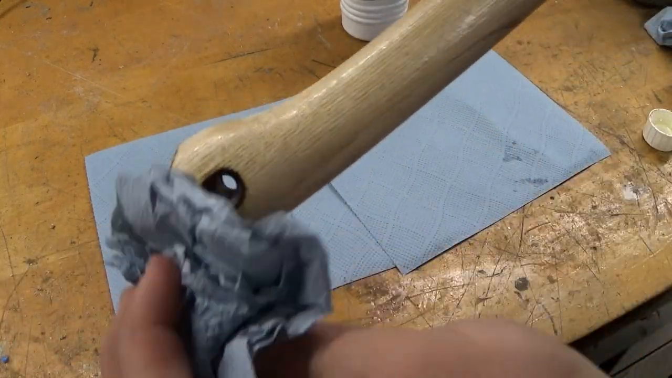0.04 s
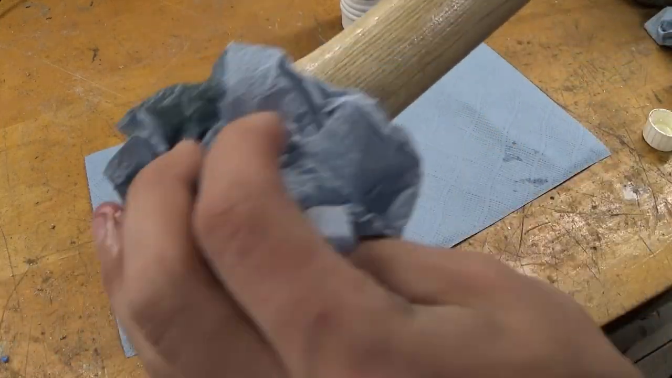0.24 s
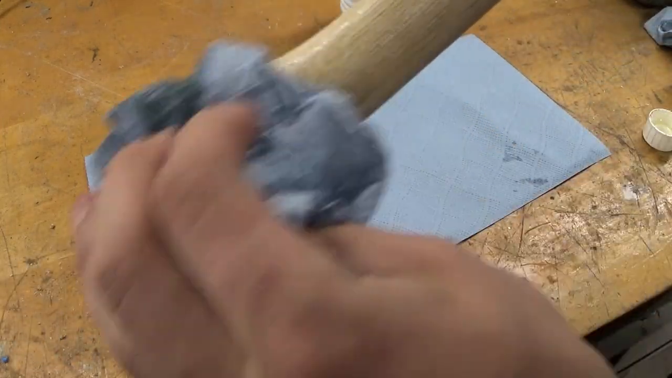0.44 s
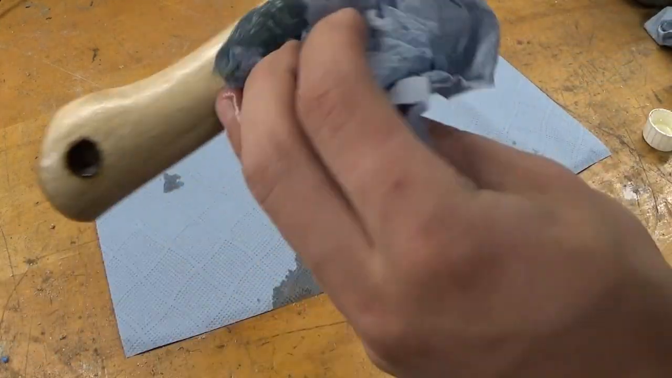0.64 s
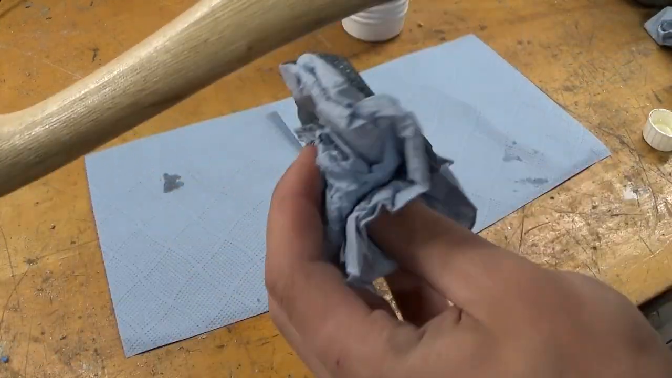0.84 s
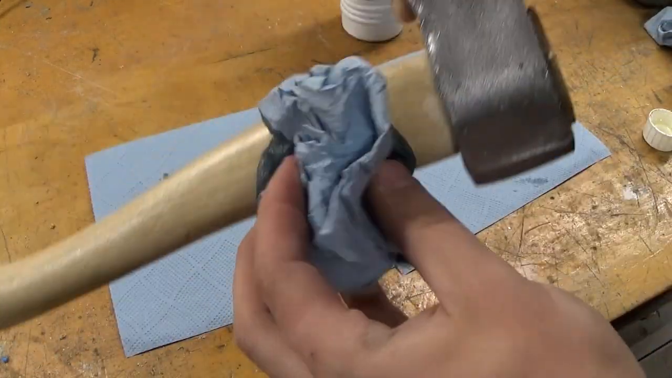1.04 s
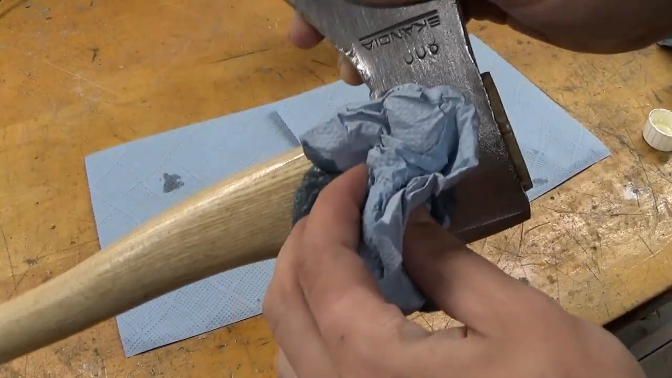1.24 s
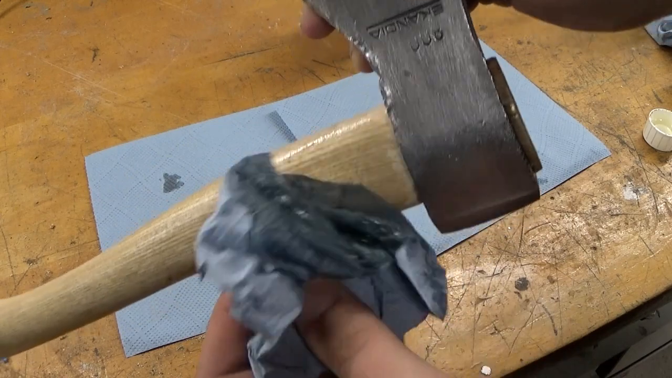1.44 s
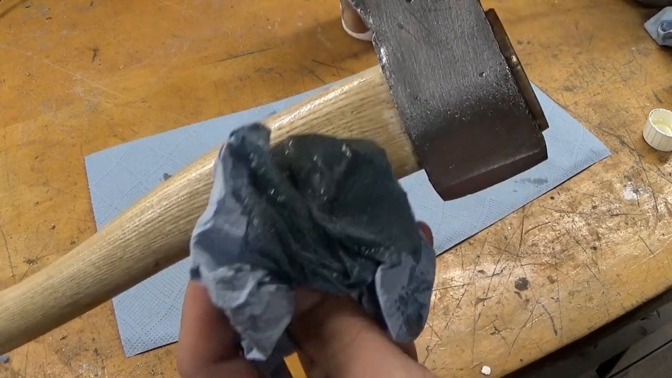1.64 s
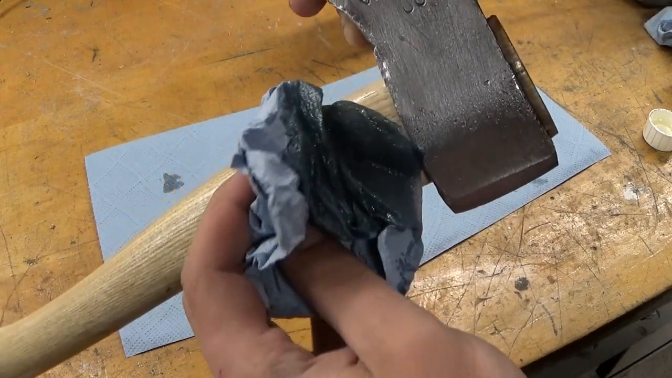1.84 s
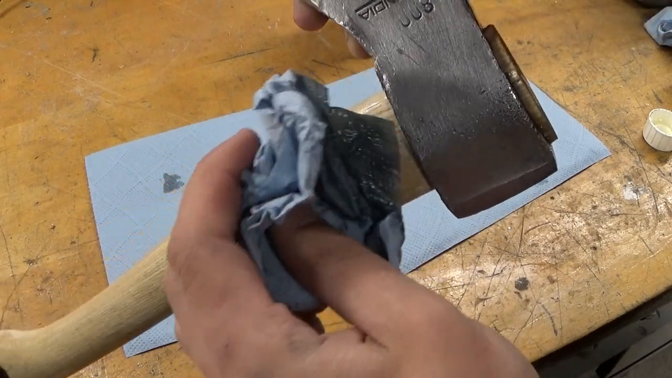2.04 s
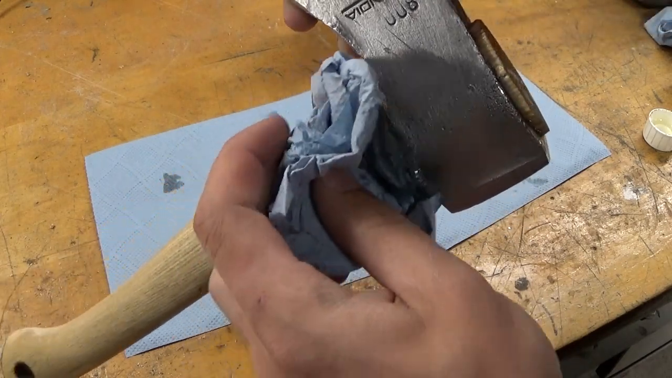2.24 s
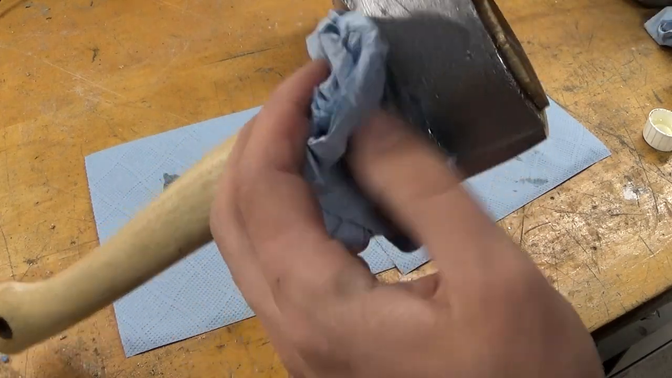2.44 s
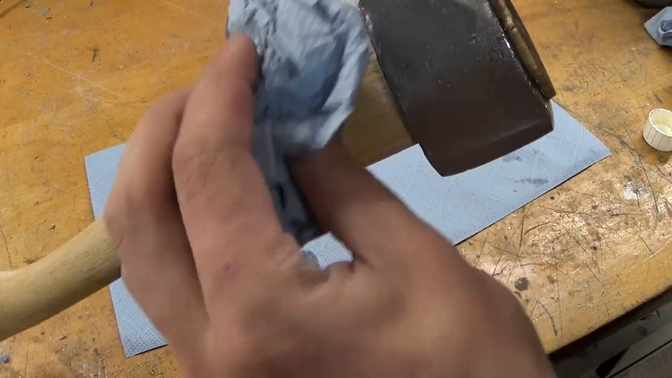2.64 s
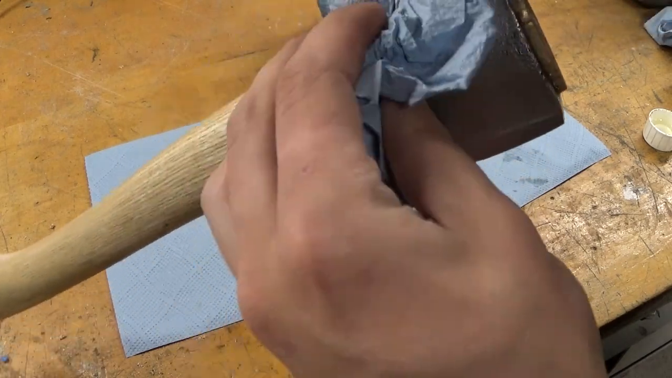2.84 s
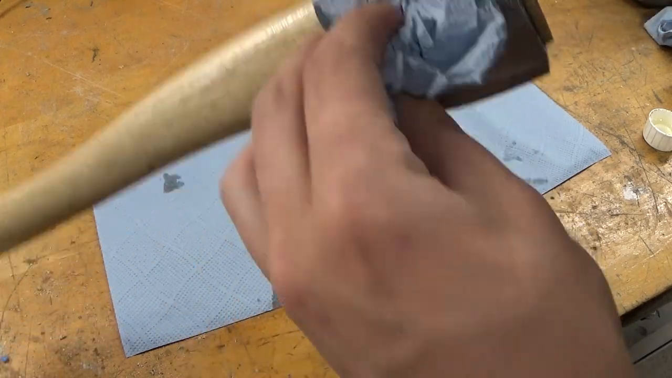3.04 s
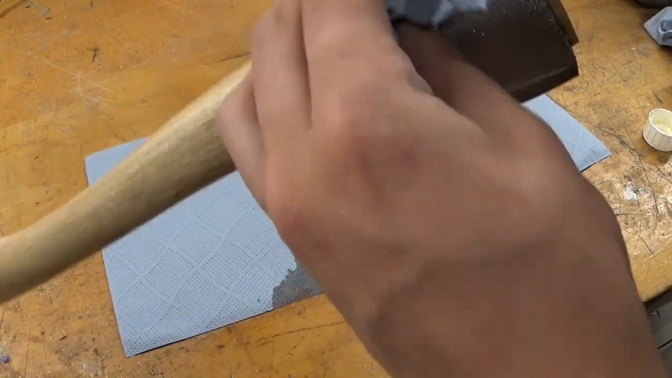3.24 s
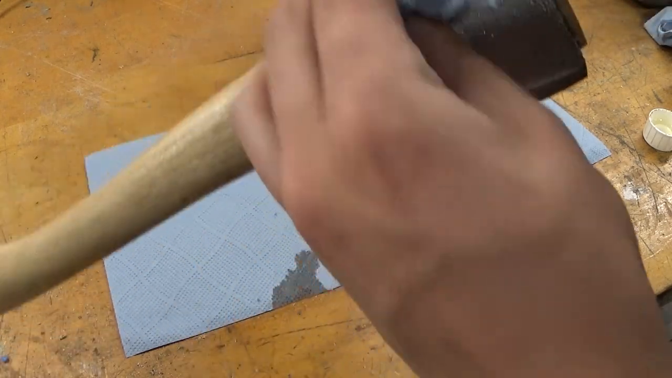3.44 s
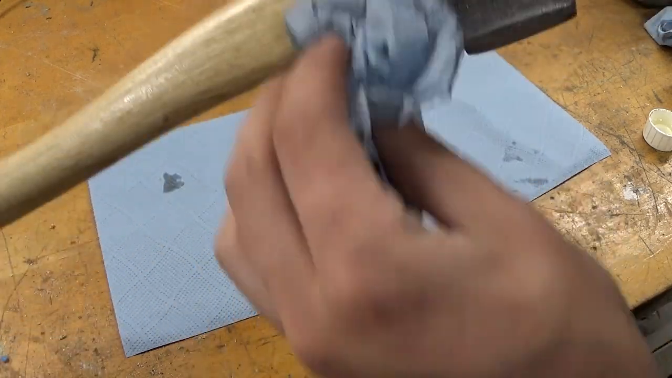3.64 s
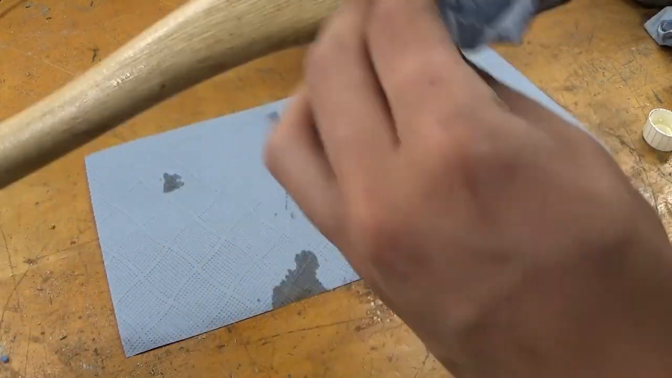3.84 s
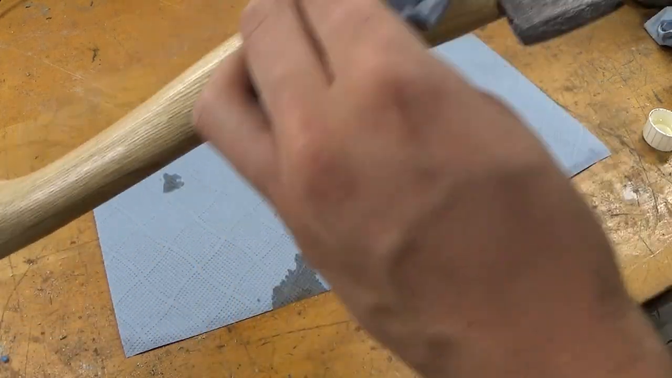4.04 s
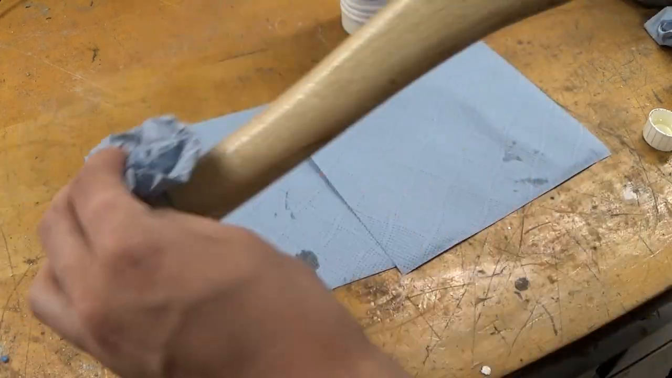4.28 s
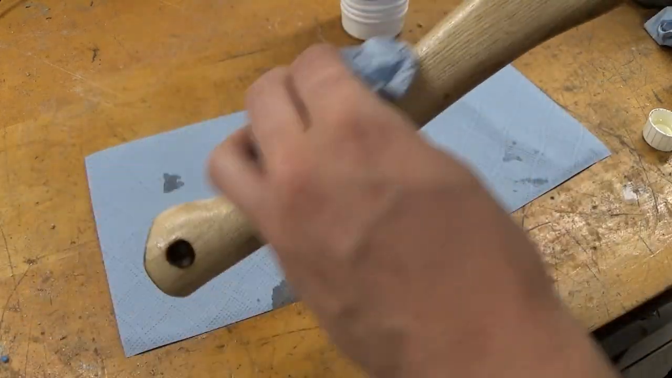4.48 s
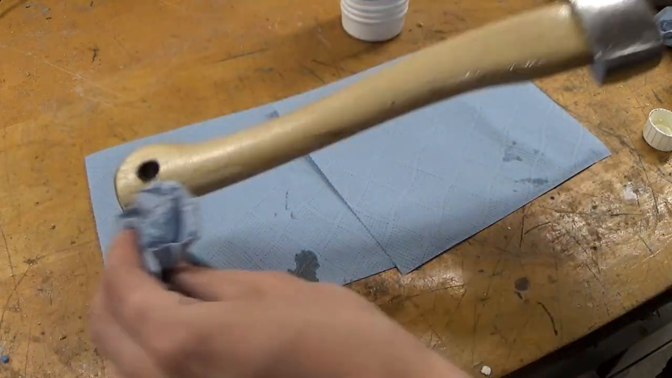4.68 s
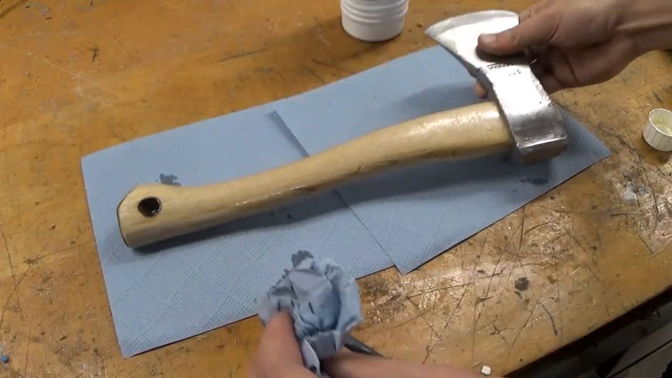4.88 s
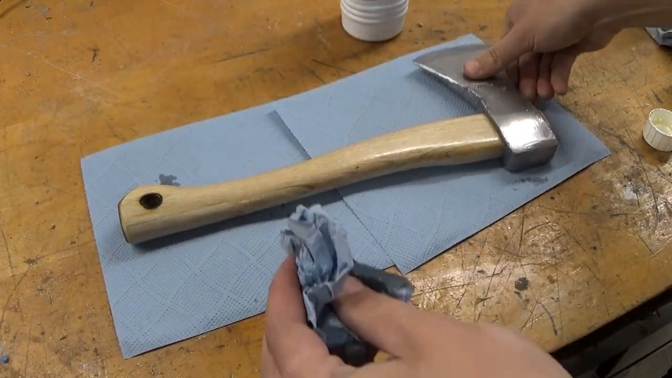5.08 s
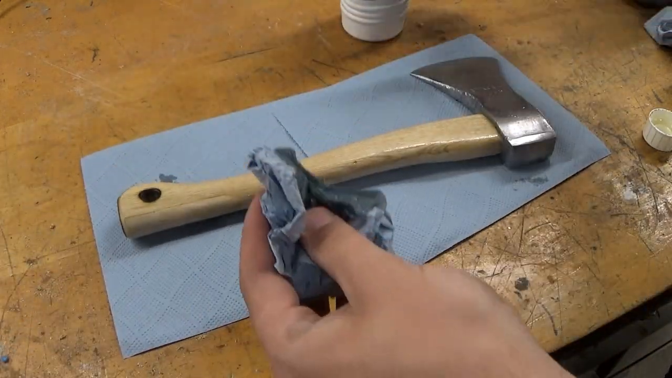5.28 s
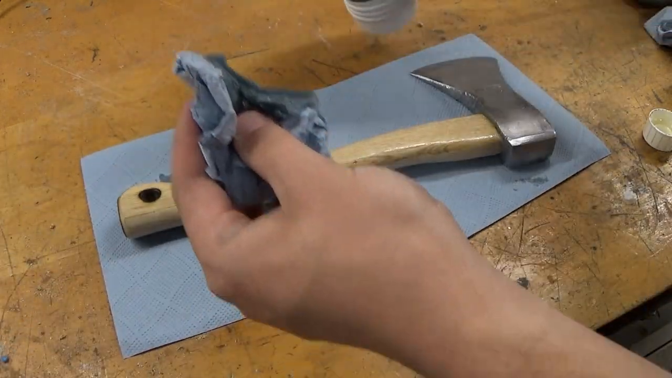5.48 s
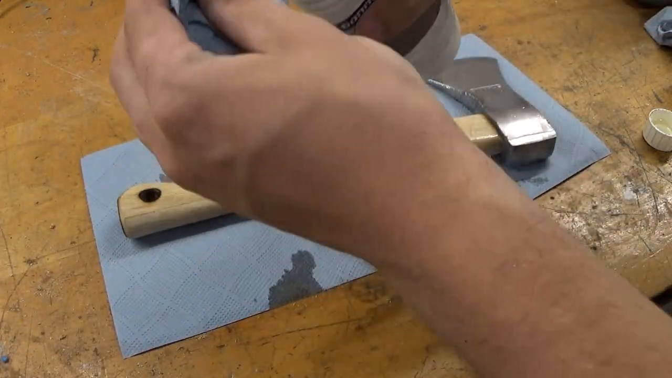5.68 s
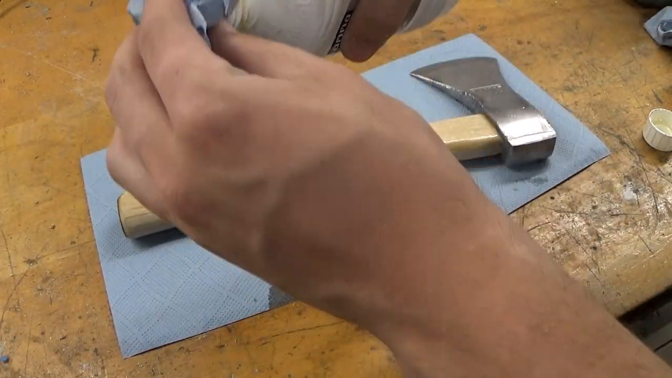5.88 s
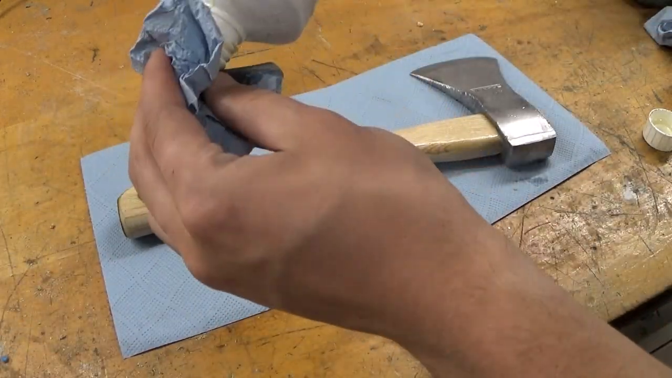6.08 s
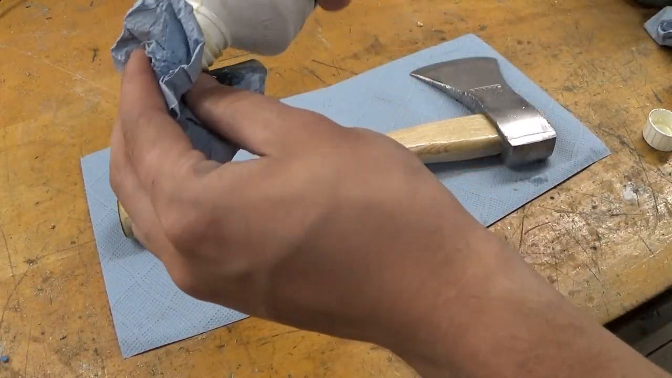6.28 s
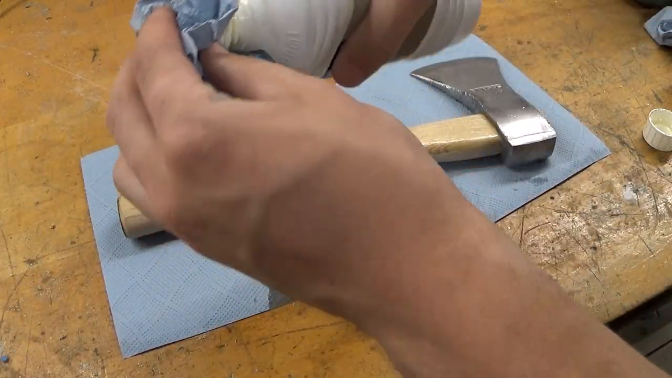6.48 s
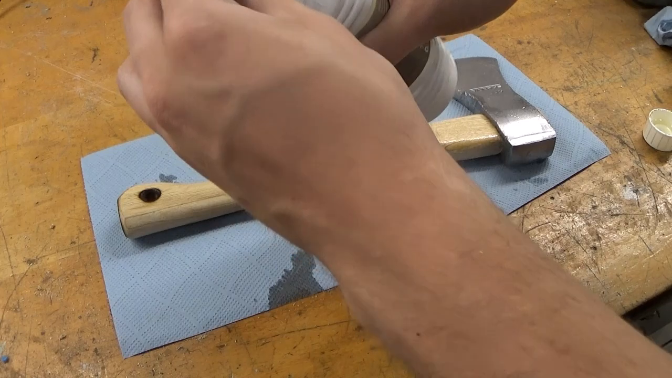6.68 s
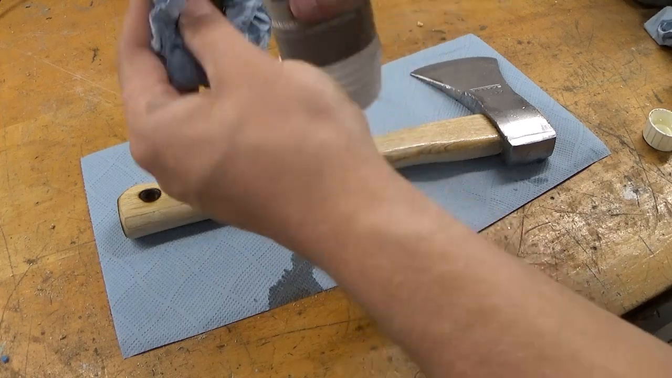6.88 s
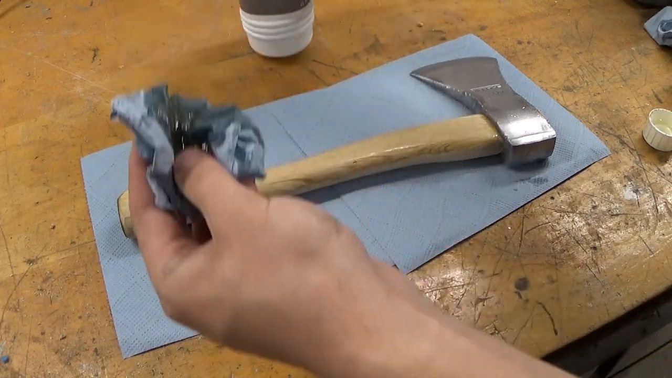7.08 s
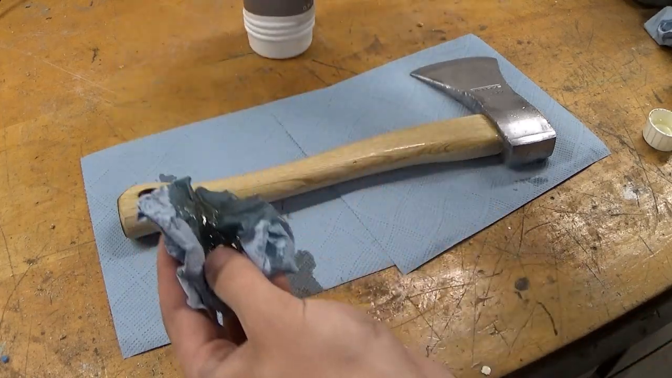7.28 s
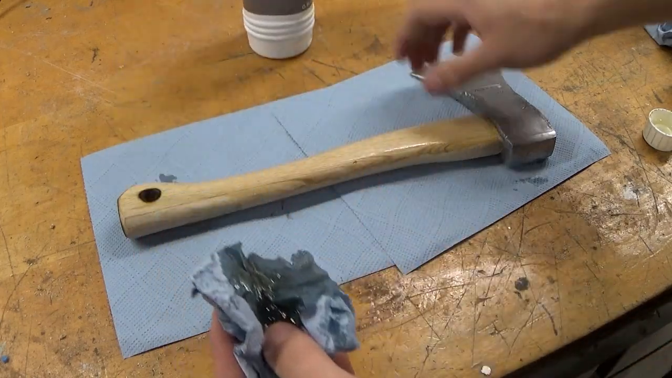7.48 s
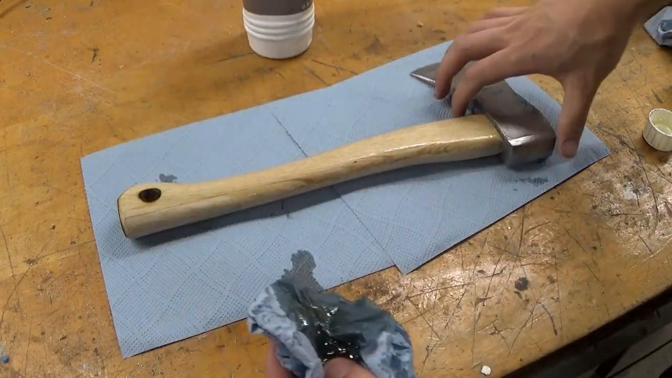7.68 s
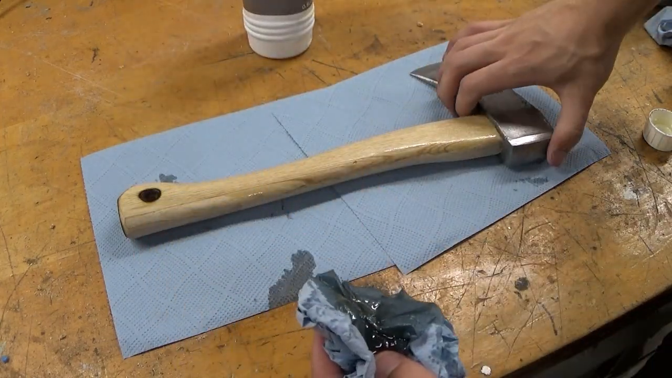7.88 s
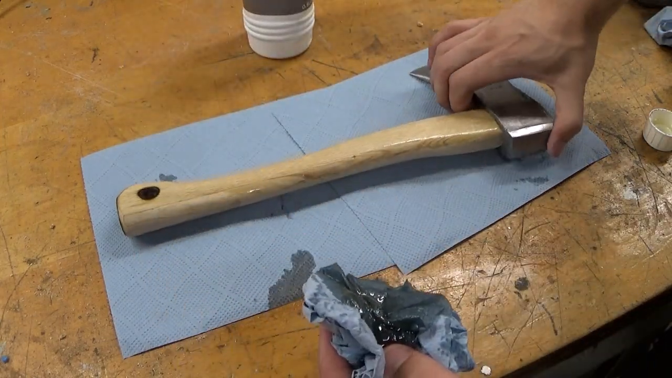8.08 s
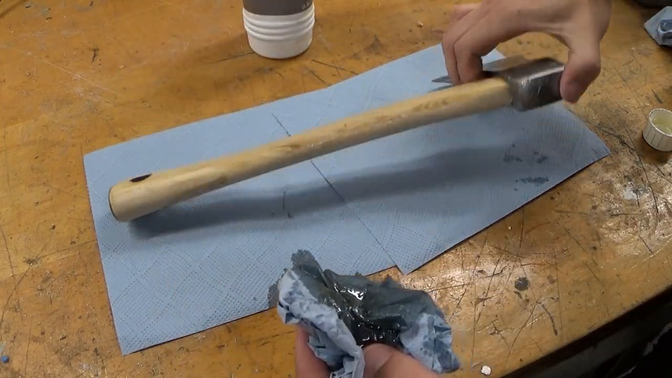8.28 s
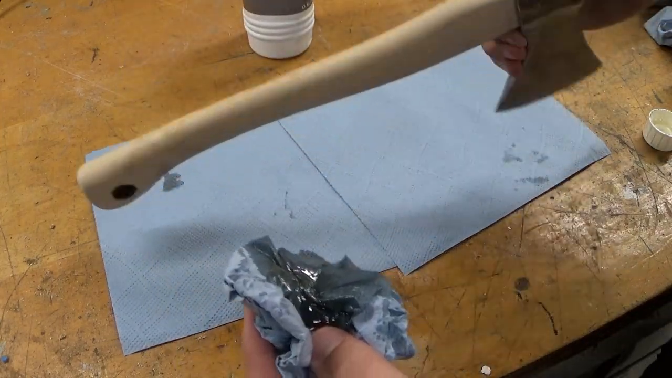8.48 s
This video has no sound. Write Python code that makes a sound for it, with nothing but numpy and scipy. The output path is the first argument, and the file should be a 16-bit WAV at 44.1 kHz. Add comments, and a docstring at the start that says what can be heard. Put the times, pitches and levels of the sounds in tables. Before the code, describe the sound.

Fast, bright papery rubbing strokes with crackly snaps, then wood-and-steel knocks on a bench, then quiet liquid gulps, light rustles and a faint cricket.

```python
"""A room hums faintly throughout and a far cricket trills, loudest after 7.2 s.
0-4.7 s: a crumpled paper towel scrubs a hatchet to and fro (slipping fibres); the handle knocks a bench once.
4.8-5.5 s: the hatchet is laid down with a few bounces (ringing wood and steel modes, rattle noise).
From 5.6 s: an oil bottle is tipped on the towel (gulp tones, ticks, rustles), set down near 7.2 s.
A limiter with fast attack and slow release holds the loud parts down."""
import sys
import numpy as np
from scipy import signal
from scipy.fft import rfft, irfft
from scipy.io import wavfile
from scipy.ndimage import uniform_filter1d

SR = 44100
rng = np.random.default_rng(int(sys.argv[2]) if len(sys.argv) > 2 else 0)


def store_wav(level_fs):
    """Save 16-bit WAV to argv[1]."""
    pcm = np.round(np.clip(np.atleast_2d(level_fs), -1, 1) * 32767)
    wavfile.write(sys.argv[1], SR, pcm.T.astype(np.int16))


N = 375732


def from_db(db):
    """Amplitude ratio of a level in dB."""
    return 10 ** (np.asarray(db) / 20)


def rms_one(x):
    """Scale to rms 1."""
    return x / np.sqrt(np.mean(x ** 2) + 1e-20)


def at_hz(points, hz):
    """Interpolate a (f/Hz, value) table over log frequency."""
    table_hz, values = np.array(points).T
    return np.interp(np.log(hz), np.log(table_hz), values)


def drift(rate_hz):
    """Slow chance of rms 1: noise at every 40th sample through a double one-pole low-pass."""
    r = np.exp(-80 * np.pi * rate_hz / SR)
    noise = rng.standard_normal(N // 40 + 2002)
    slow = signal.lfilter([1], [1, -2 * r, r * r], noise)[2000:]  # drop the filter's start
    return np.interp(np.arange(N) / 40, np.arange(len(slow)), rms_one(slow))


def clicks(times_s, sizes):
    """Train of single samples on a negligible floor."""
    out = np.full(N, 1e-18)
    out[np.round(np.asarray(times_s) * SR).astype(int)] = sizes
    return out


def ring(drive, hz, t60_s):
    """Two-pole resonator: a unit click sets off a decaying sine of initial height 1."""
    r = from_db(-60 / (t60_s * SR))
    w = 2 * np.pi * hz / SR
    return signal.lfilter([0, np.sin(w)], [1, -2 * r * np.cos(w), r * r], drive)


def spread(mid, side, alike):
    """Mix two unrelated signals to left and right with correlation `alike`."""
    return np.sqrt(1 + alike) * mid + np.sqrt(1 - alike) * side * [[1], [-1]]


def bands(low_hz, count, likeness):
    """Half-octave bands of stereo noise, neighbours unrelated; yields (f/Hz, band of rms 1)."""
    white = rng.standard_normal((2, 2, N))
    edges_hz = low_hz * 2 ** (np.arange(count + 1) / 2)
    for k, (low, high) in enumerate(zip(edges_hz, edges_hz[1:])):
        band_pass = signal.butter(2, [low, high], "band", fs=SR, output="sos")
        mid, side = signal.sosfilt(band_pass, white[k % 2])
        hz = np.sqrt(low * high)
        alike = np.clip(at_hz(likeness, hz), 0, 1)
        yield hz, rms_one(spread(mid, side, alike))


def coloured(mid_side, spectrum, likeness):
    """Two unrelated sources become a stereo pair with the given spectrum and likeness; rms 1."""
    hz = np.maximum(np.fft.rfftfreq(N, 1 / SR), 1)
    alike = np.clip(at_hz(likeness, hz), 0, 1)
    mid, side = rfft(mid_side) * from_db(at_hz(spectrum, hz))
    return rms_one(irfft(spread(mid, side, alike), N))


TURN_KNEE_DB, TURN_BEND = 10, 1.36  # level leaves its hold gently, drops ever faster beyond the knee
AFTER_DB, AFTER_FALL_DB_PER_S = -15.5, 150  # towel springs back and whispers on after a movement


def moves(s, held_s, level_db, swell_db, rise_db_per_s, fall_db_per_s):
    """Power of each movement, one value a ms: rounded rise, swelling or sagging hold, fall, faint tail."""
    t = np.arange(0, N / SR, .001)[:, None]
    held_s = np.maximum(held_s, .002)
    before_s = np.maximum(s - t, 0)
    after_s = np.maximum(t - s - held_s, 0)
    hold_db = level_db + swell_db * (np.clip((t - s) / held_s, 0, 1) - .5)
    straight_db = rise_db_per_s * before_s + fall_db_per_s * after_s
    turn_db = TURN_KNEE_DB * (straight_db / TURN_KNEE_DB) ** TURN_BEND
    tail = (after_s > 0) * 10 ** ((level_db + AFTER_DB - AFTER_FALL_DB_PER_S * after_s) / 10)
    return t[:, 0], 10 ** ((hold_db - turn_db) / 10) + tail


# room hum spectrum, relative: f/Hz, density/dB
ROOM_SPECTRUM = [(40, -17.5), (90, -4.5), (170, -8.5), (400, -8.5), (630, -7.5), (900, -10.5),
                 (2600, -15.5), (5000, -16), (7000, -23), (16000, -24)]
# room left-right correlation: f/Hz, likeness/1
ROOM_LIKENESS = [(60, 0.99), (180, 0.9), (550, 0.28), (1650, 0.09), (4970, 0.43), (15000, 0.91)]
ROOM_RMS_DB = -56.5


def room():
    """Steady faint hum of a small workshop: coloured noise."""
    return from_db(ROOM_RMS_DB) * coloured(rng.standard_normal((2, N)), ROOM_SPECTRUM, ROOM_LIKENESS)


CRICKET_HZ, CRICKET_T60_S, CRICKET_DB, CRICKET_PULSES_PER_S = 5030, 0.024, -71.5, 40
TRILL_S, TRILL_HELD_S, TRILL_LIFT_DB = 7.2, .6, 6.5  # loudest trill


def cricket():
    """Noise pulses ring one pitch; the level comes and goes, left and right unrelated."""
    t = np.arange(N) / SR
    s = np.cumsum(rng.normal(1, 0.044, 400)) / CRICKET_PULSES_PER_S
    pulses = signal.lfilter(np.hanning(300), [1], clicks(s[s < N / SR - .01], 1))
    in_trill = np.abs(t - TRILL_S - TRILL_HELD_S / 2) < TRILL_HELD_S / 2
    level_db = CRICKET_DB + 2.2 * drift(1.9) + TRILL_LIFT_DB * in_trill
    trill = ring(pulses * rng.standard_normal((2, N)), CRICKET_HZ, CRICKET_T60_S)
    return from_db(level_db) * rms_one(trill)


# dull low thumps: t/s, level before softening/dB, f/Hz, t60/s
THUMPS = [(3.63, -33, 89, 0.039), (3.787, -32, 60, 0.051), (3.993, -30, 63.4, 0.14),
          (7.159, -21, 400, 0.038), (7.8, -53.5, 91, 0.53)]
# oil gulps in the bottle: t/s, level before softening/dB, f/Hz, t60/s
GULPS = [(5.735, -46, 840, 0.065), (5.767, -44.5, 837, 0.088), (6.029, -38.5, 434, 0.032),
         (6.699, -51.5, 1128, 0.099), (6.792, -51.5, 783, 0.075), (6.839, -52, 845, 0.19),
         (6.869, -57, 860, 0.12), (6.919, -50.5, 844, 0.15), (6.996, -51.5, 830, 0.085),
         (7.299, -43.5, 883, 0.061)]


def soft_tones(table, soften):
    """Single pitches with a low-passed start: air pockets in the oil, or a padded thump."""
    tones = sum(ring(clicks([s], from_db(db)), hz, t60_s) for s, db, hz, t60_s in table)
    return signal.lfilter([1 - soften], [1, -soften], tones)


# bottle and paper ticks, and the sharp cracks of knocks: t/s, peak of the noise puff/dB, f/Hz
TICKS = [(0.0238, -40, 9700), (0.0373, -28, 6400), (0.0967, -34, 7800), (0.1191, -25, 11300),
         (0.134, -26.5, 7690), (1.408, -9, 8900), (1.429, -8, 9000), (1.442, -14, 9000),
         (1.456, -11.5, 7050), (1.472, -10, 9000), (1.68, -11, 4500), (1.7094, -29, 8500),
         (2.0474, -10.5, 6260), (2.1495, -8.5, 5700), (2.3068, -11.5, 1830), (5.6506, -39.5, 5050),
         (5.893, -32, 9200), (5.9863, -33, 6050), (6.0484, -28.5, 1600), (6.049, -35.5, 420),
         (6.0495, -29, 5400), (6.115, -20, 3820), (6.4108, -37, 6700), (6.576, -33, 4800),
         (7.175, -27, 1704), (7.182, -31, 2500), (7.148, -38, 4470), (7.2, -34, 2490), (7.2205, -31, 6050),
         (7.655, -38, 9900)]
TICK_T60_S, TICK_CRACK = 0.028, 4.0  # the last: height of the first crack over the puff


def ticks():
    """A fast-dying noise puff, band-passed around its pitch, plus a short sine ring."""
    out = np.zeros(N)
    t = np.arange(4000) / SR
    fade = from_db(-60 * t / TICK_T60_S) + TICK_CRACK * from_db(-60 * t / .002)
    for s, db, hz in TICKS:
        noise = rng.standard_normal(len(t))
        edges_hz = [hz / 1.48, min(hz * 1.58, 17000)]
        puff = signal.lfilter(*signal.butter(2, edges_hz, "band", fs=SR), noise * fade)
        sine = np.sin(2 * np.pi * .87 * hz * t) * from_db(-40 * t / TICK_T60_S)
        snap = puff / np.abs(puff).max() + 0.16 * min(1, (3500 / hz) ** 2) * sine
        out[round(s * SR):][:len(t)] += from_db(db) * snap
    return out


# the head drags on the mat: t/s, held/s, level/dB
DRAGS = [(5.14, .03, -47), (8.195, .05, -61)]
# steel head modes, also rung by knocks(): f/Hz, level/dB, t60 when struck/s
STEEL_MODES = [(2605, -6.5, .11), (3020, -4, 0.082), (3060, 2.5, 0.1), (4245, -6.5, 0.17),
               (4300, -11.5, .12), (5200, -11.5, .08), (6320, -10.5, 0.19), (10600, -16, 0.12)]
LIGHT_RISE_DB_PER_S, LIGHT_FALL_DB_PER_S = 399, 331  # drags and rustles, slope before the turn's bend


def drags():
    """Friction noise sets the steel singing faintly, the long and high modes most."""
    s, held_s, level_db = np.transpose(DRAGS)
    ms, power = moves(s, held_s, level_db, 0, LIGHT_RISE_DB_PER_S, LIGHT_FALL_DB_PER_S)
    noise = rng.standard_normal(N)

    def sing(drive):
        return sum(from_db(db + 20 * np.log2(hz / 4000) + 60 * t60_s) * ring(drive, hz, t60_s / 3)
                   for hz, db, t60_s in STEEL_MODES)

    friction = np.interp(np.arange(N) / SR, ms, np.sqrt(power.sum(axis=1))) * noise
    return sing(friction + 1e-18) / np.std(sing(noise))


# bench knocks: t/s, strength/dB, hardness/Hz, bass/dB, bass limit/Hz, best-driven f/Hz,
# thud/dB, steel ring/dB, best-driven steel f/Hz
KNOCKS = [(2.3068, -14, 800, -1.5, 250, 408, -7.5, -49.5, 5200),
          (4.8316, -15, 2180, -1.5, 500, 1320, -19, -20.5, 3030),
          (4.9025, -17.5, 1890, -6, 500, 1250, -22, -22.5, 3000),
          (4.9211, -26.5, 1890, -1, 500, 1300, -9, -39, 3000),
          (4.9756, -1.5, 1010, -7, 170, 530, -15, -33, 3000),
          (5.153, -26.5, 500, 16, 250, 453, -20, -60, 4350),
          (5.179, -4, 1800, -9.5, 250, 1480, -14, -7.5, 4650),
          (5.199, -15.5, 1500, -15, 250, 1220, -20, -19, 4280),
          (5.412, -43, 170, 3, 170, 158, -44, -80, 3040), (5.449, -40.5, 170, 6, 170, 156, -46, -80, 3040),
          (7.174, -19, 230, 15.5, 200, 252, -9, -80, 3000),
          (7.184, -29.5, 600, 3, 250, 890, -36, -80, 3000)]
# bench top modes: f/Hz, level/dB, t60 before settling/s
BENCH_MODES = [(154.8, -3, 0.46), (195, -0.5, 0.242), (227.6, 1.5, 0.24), (267.6, -10, 0.16),
               (345, -4, 0.27), (395, -6, 0.22), (490, 2, 0.18), (544, -15.5, 0.36), (570, -2, 0.1),
               (660, -5, 0.25), (813, -7, 0.22), (1002, -8, .18), (1258, -12.5, 0.13), (1340, -7, .13),
               (1550, -10, 0.27), (1705, -11, 0.17)]
# bench frame and tools on it, ringing on: f/Hz, level/dB, t60/s
LINGERING_MODES = [(93.3, -15.5, 0.71), (470, -17, 0.43), (544, -10, 0.33), (689, -15, 0.83),
                   (727, -22.5, .5), (790, -24, .7), (880, -25.5, .7), (1010, -20.5, 0.54), (1119, -28, 1),
                   (1820, -20, .45), (1810, -18.5, .45)]
# rattle of loose things and dense board modes, per band: f/Hz, level/dB
RATTLE_LEVEL = [(100, -21), (250, 0.5), (600, 8.5), (1500, 14.5), (3000, 7), (6000, -40), (12000, -30)]
# rattle decay before settling: f/Hz, t60/s
RATTLE_T60 = [(100, 0.3), (500, 0.18), (1500, 0.15), (4000, .12), (12000, 0.064)]
# rattle left-right correlation: f/Hz, likeness/1
RATTLE_LIKENESS = [(100, 1), (380, 0.9), (1300, 0.32), (4400, 1), (12000, .9)]
SETTLE_S, SETTLE_DB_PER_S = 0.09, 204  # struck thing comes to rest and damps the short rings


def knocks():
    """Each knock rings bench and steel modes and starts a rattle; soft contact drives few highs."""
    (s, strength_db, hardness_hz, bass_db, bass_hz, best_hz,
     thud_db, steel_db, steel_hz) = np.transpose(KNOCKS)

    def reach_db(hz):
        soft_db = -22 * np.log10(1 + (hz / hardness_hz) ** 2)
        low_db = bass_db / (1 + (hz / bass_hz) ** 2)
        best_db = 7 * np.exp(-(np.log2(hz / best_hz) / 0.18) ** 2)
        return strength_db + soft_db + low_db + best_db

    def spot_db(hz):
        # where the head is struck decides which of its modes speak
        return steel_db - 14 * np.minimum(np.abs(np.log2(hz / steel_hz)) / .5, 1)

    t = np.arange(N) / SR
    since_s = t - np.r_[0, s][np.searchsorted(s, t, side="right")]
    settle = from_db(-SETTLE_DB_PER_S * np.maximum(since_s - SETTLE_S, 0))
    wood = BENCH_MODES + LINGERING_MODES
    luck = rng.normal(0, 1, (len(wood + STEEL_MODES), len(s)))
    out = 0
    for (hz, db, t60_s), z in zip(STEEL_MODES, luck[::-1]):
        out = out + settle * ring(clicks(s, from_db(spot_db(hz) + db + 1.2 * z)), hz, t60_s)
    for k, (hz, db, t60_s) in enumerate(wood):
        # neighbouring modes swing in opposite sense; pairs lean to alternate sides
        alike = np.clip(at_hz(RATTLE_LIKENESS, hz), 0, 1)
        aside = np.sqrt(1 - alike) * 0.46 * (-1) ** (k // 2)
        mode = ring(clicks(s, from_db(reach_db(hz) + db - 7 + 2 * luck[k])), hz, t60_s)
        damping = settle if k < len(BENCH_MODES) else 1
        out = out + (-1) ** k * mode * damping * [[1 + aside], [1 - aside]]
    for at_s, db, hz in zip(s, thud_db, best_hz):  # contact thud of a few cycles
        out = out + ring(clicks([at_s], from_db(db)), hz, 9.0 / hz)
    for hz, band in bands(118.9, count=13, likeness=RATTLE_LIKENESS):
        fade = from_db(-60 / (at_hz(RATTLE_T60, hz) * SR))
        rise = np.exp(-1.5 * hz / SR)
        starts = clicks(s, from_db(reach_db(hz) + at_hz(RATTLE_LEVEL, hz) - 8.0))
        envelope = signal.lfilter([1 - rise], np.convolve([1, -fade], [1, -rise]), starts)
        out = out + band * envelope * settle
    return signal.sosfilt(signal.butter(4, 80, "high", fs=SR, output="sos"), out)


# rumble spectrum, relative: f/Hz, density/dB
RUMBLE_SPECTRUM = [(30, -13), (60, -12), (90, -10), (170, -8.5), (350, -8.5), (620, -4), (850, -12),
                   (1300, -12.5), (2500, -17), (6000, -58)]
# left-right correlation of rumble and towel: f/Hz, likeness/1
LIKENESS = [(30, 0.98), (60, 1), (180, 1), (550, 1), (1400, 1), (3100, 0.87), (6000, 0.93), (15000, 0.95)]


def rumble(level_db, lumpy_db):
    """Low lumpy noise that the handle gives off under the hand."""
    noise = coloured(rng.standard_normal((2, N)), RUMBLE_SPECTRUM, LIKENESS)
    return from_db(level_db + lumpy_db * drift(25)) * noise


# one row a stroke: t at full speed/s, held/s, level/dB, swell over the hold/dB, brightness/dB
STROKES = [(0.027, 0.06, -34.5, 0, 0.5), (0.193, 0.036, -20.5, -0.5, 1.5), (0.273, 0.067, -22.5, -7.5, 1),
           (0.384, 0.051, -18, 4.5, 4), (0.483, 0.038, -21.5, -6.5, 6.5), (0.562, 0.17, -21, -3, 6.5),
           (0.703, 0.083, -15.5, 8.5, 3), (0.819, 0.047, -21.5, -1.5, 0), (0.92, 0.015, -24.5, -3.5, -2.5),
           (0.985, 0.035, -31.5, -5.5, -2), (1.049, 0.098, -25.5, -1.5, 0.5), (1.194, 0.11, -21, 1.5, 1.5),
           (1.343, 0.054, -23.5, 3.5, -1), (1.442, 0.08, -25.5, 2, -2), (1.536, 0.044, -22.5, 8, 2),
           (1.618, 0.11, -28.5, -1.5, -0.5), (1.767, 0.17, -26.5, -8.5, -1), (1.903, 0.03, -34.5, 18, 1.5),
           (1.977, 0.077, -27, 0.5, 1.5), (2.13, 0.032, -24, -4, 1.5), (2.197, 0.12, -30.5, -16, 0),
           (2.313, 0.085, -25, 1.5, -4.5), (2.435, 0.073, -23, 16, 4.5), (2.573, 0.18, -28.5, -11.5, 1.0),
           (2.725, 0.057, -26, -3.5, 1.5), (2.809, 0.044, -19.5, 3.5, -0.5), (2.944, 0.03, -19.5, -6, 5),
           (3.003, 0.012, -19.5, 8.5, 0.5), (3.104, 0.036, -19, 2, 3.5), (3.186, 0.069, -18.5, -2.5, 1),
           (3.3, 0.065, -18.5, 3.5, 5.5), (3.415, 0.063, -17.5, -0.5, 4), (3.515, 0.101, -16, 2, 2),
           (3.715, 0.012, -26.5, 5.5, 1.5), (3.767, 0.026, -26, 2.5, -0.5), (3.826, 0.077, -21, 0.5, 5.5),
           (3.988, 0.0053, -26, 25.5, -4.5), (4.042, 0.329, -20.5, 0, 6.5), (4.423, 0.071, -20, 11, 5.5),
           (4.535, 0.11, -21.5, -1, 5.5)]
# light towel and sleeve rustles: t/s, held/s, level/dB, brightness/dB
RUSTLES = [(4.7, 0.094, -48.5, -5), (5.002, 0.056, -49, 8), (5.15, 0.074, -52, 8), (5.35, .015, -60, 1.5),
           (5.42, 0.043, -55.5, 0), (5.48, 0.013, -47.5, 5), (5.631, .08, -63, 4),
           (5.836, 0.28, -56.5, 5.5), (6.41, .015, -59, 12), (6.576, 0.03, -61, 5.5),
           (6.771, 0.071, -56, 5), (7.035, 0.049, -52, -6), (7.09, 0.026, -46, -4.5),
           (7.14, 0.094, -56.5, -4), (7.347, 0.036, -54.5, 1), (7.815, 0.032, -50, 7),
           (7.92, .035, -58.5, 13), (7.99, 0.026, -52, -7), (8.07, 0.018, -53.5, 0), (8.14, 0.023, -53, 8),
           (8.19, 0.061, -52.5, -2), (8.33, 0.072, -51, 3)]
# rumble before the hand's quick swings: t/s, level/dB
RUMBLE_LEVEL = [(0, -52), (.64, -43), (1.0, -50.5), (1.39, -42.5), (1.85, -51), (2.5, -48.5), (3.1, -51),
                (3.5, -45.5), (3.8, -50.5), (4.45, -45.5), (4.86, -53.5), (5.4, -49), (5.6, -65.5),
                (6.3, -84), (7.4, -62), (7.55, -59.5), (8.0, -56), (8.5, -64)]
# hiss slopes out of and into a turn, for a -19.5 dB stroke, before the turn's bend
SPEED_UP_DB_PER_S, SLOW_DOWN_DB_PER_S = 648, 598
BRISK_PER_DB = 0.01  # relative gain in slope per dB of a harder stroke
STILL_DB, STILL_BRIGHT_DB = -63.5, 4  # towel held still
RUMBLE_FOLLOWS = 0.13  # share of the hand's quick swings that the rumble takes over


def hand():
    """Rubbing level, brightness and rumble level in time; the louder of overlapping moves sets brightness."""
    s, held_s, level_db, swell_db, bright_db = np.transpose(STROKES)
    brisk = np.maximum(1 + BRISK_PER_DB * (level_db + 19.5), .4)
    ms, strokes = moves(s, held_s, level_db, swell_db, SPEED_UP_DB_PER_S * brisk, SLOW_DOWN_DB_PER_S * brisk)
    s, held_s, level_db, light_bright_db = np.transpose(RUSTLES)
    _, rustles = moves(s, held_s, level_db, 0, LIGHT_RISE_DB_PER_S, LIGHT_FALL_DB_PER_S)
    power = np.c_[strokes, rustles]
    still = 10 ** (STILL_DB / 10)
    total = power.sum(axis=1) + still
    level = 10 * np.log10(total)
    brightness = (power @ np.r_[bright_db, light_bright_db] + STILL_BRIGHT_DB * still) / total
    quick_db = level - uniform_filter1d(level, size=300)  # against a 300 ms mean
    low = np.interp(ms, *np.transpose(RUMBLE_LEVEL)) + RUMBLE_FOLLOWS * quick_db
    return [np.interp(np.arange(N) / SR, ms, v) for v in (level, brightness, low)]


# paper hiss spectrum, relative: f/Hz, density/dB
PAPER_SPECTRUM = [(30, -72), (700, -12.5), (1200, -4), (1900, 3.5), (2400, 7.5), (3500, 7.5), (5200, 11.5),
                  (9000, 12.5), (13000, 9.5), (16000, 4.5)]
CAVITY_HZ, CAVITY_DB = 2580, -8  # hollow of the cupped hand; dB at brightness 1.5 dB, more when duller
HAND_ECHO, HAND_ECHO_MS, HAND_ECHO_SWING_MS = 0.3, 0.2186, 0.054  # moving hand reflects the hiss


def towel(level_db, bright_db, slips_per_s, spread_db, snaps_per_s, snap_db, flutter_db, patch_db):
    """Thousands of fibres slip each second, now and then a crease snaps; shifting folds recolour the hiss."""
    sizes_db = spread_db * np.minimum(rng.exponential(1, (2, N)), 5)
    sizes = from_db(sizes_db) * rng.choice([-1, 1], (2, N))
    slips = sizes * (rng.random((2, N)) < slips_per_s / SR)
    # hard, fast rubbing flattens the creases, so snaps stand out less
    snap_gain = from_db(snap_db - 0.67 * np.maximum(level_db + 34.0, 0))
    snaps = snap_gain * sizes[0] * (rng.random(N) < snaps_per_s / SR)
    hiss = coloured(slips + snaps, PAPER_SPECTRUM, LIKENESS)
    lag = np.maximum(HAND_ECHO_MS + HAND_ECHO_SWING_MS * drift(2.42), .02) * SR / 1000  # samples
    n = np.arange(N)
    echo = np.array([np.interp(n - lag, n, side) for side in hiss])
    hiss = rms_one(hiss + HAND_ECHO * echo)
    patch_db = patch_db * np.clip((-9.5 - level_db) / 12, .2, 1)  # a firm stroke is steadier
    out, below = 0, 0
    for hz in (1500, 2600, 4300, 7000, 11000, 18000):  # upper edges of the slices
        upto = signal.lfilter(*signal.butter(2, hz, fs=SR), hiss)
        # brightness tilts the slices around 6 kHz; each slice swells on its own
        tilt_db = .5 * (bright_db - 5.0) * np.log2(hz / 6000)
        out = out + (upto - below) * from_db(tilt_db + patch_db * drift(14))
        below = upto
    hollow = signal.lfilter(*signal.iirpeak(CAVITY_HZ, 3.5, fs=SR), hiss)
    out = out + hollow * from_db(CAVITY_DB - 1.6 * (bright_db - 1.5) + patch_db * drift(6))
    return from_db(level_db + flutter_db * drift(120)) * out


def scene():
    """Sum of all sources, background to foreground."""
    level_db, bright_db, rumble_db = hand()
    tones = soft_tones(THUMPS, soften=0.99) + soft_tones(GULPS, soften=0.55)
    background = room() + cricket() + tones
    contacts = ticks() + drags() + knocks()
    paper = towel(level_db, bright_db, slips_per_s=16000, spread_db=1.0, snaps_per_s=55, snap_db=19.0,
                  flutter_db=0.68, patch_db=3.0)
    return background + contacts + rumble(rumble_db, lumpy_db=2.8) + paper


LIMIT_DB, ATTACK_S = -11, 0.00064
EXCESS_RELEASE_DB_PER_S = 246  # of the held excess
CUT_PER_DB = .8  # gain cut per dB of excess
CUTOFF_HZ = 16250


def record(dry):
    """A limiter turns loud passages down fast and recovers slowly; peaks are rounded, the top is cut."""
    power = uniform_filter1d(np.mean(dry ** 2, axis=0), size=300)
    level_db = 10 * np.log10(power + 1e-12)
    ramp_db = EXCESS_RELEASE_DB_PER_S * np.arange(N) / SR
    over_db = np.maximum.accumulate(np.maximum(level_db - LIMIT_DB, 0) + ramp_db) - ramp_db
    r = np.exp(-1 / (ATTACK_S * SR))
    limited = dry * from_db(-CUT_PER_DB * signal.lfilter([1 - r], [1, -r], over_db))
    low_pass = signal.cheby2(24, 70, CUTOFF_HZ, fs=SR, output="sos")
    return signal.sosfilt(low_pass, np.tanh(limited))


dry = scene()
out = record(dry)
store_wav(out)
```